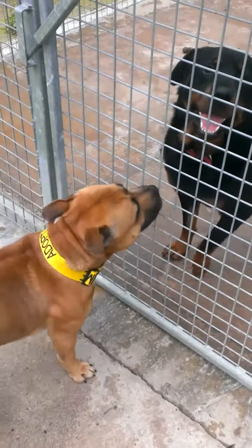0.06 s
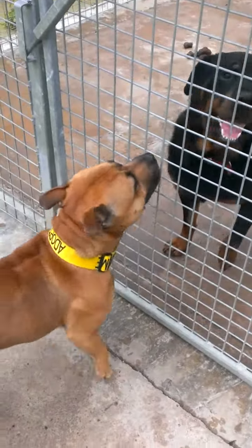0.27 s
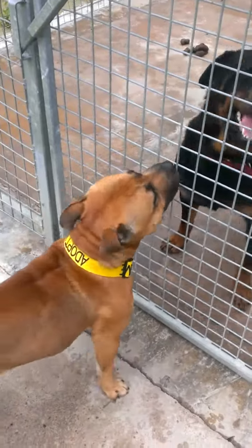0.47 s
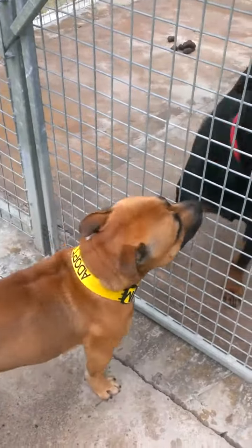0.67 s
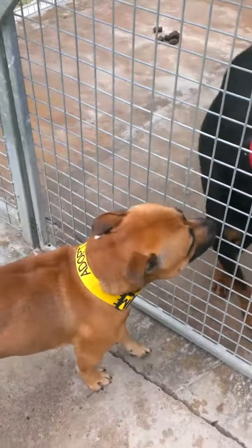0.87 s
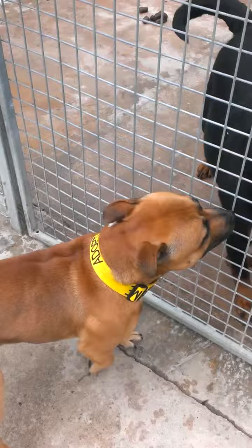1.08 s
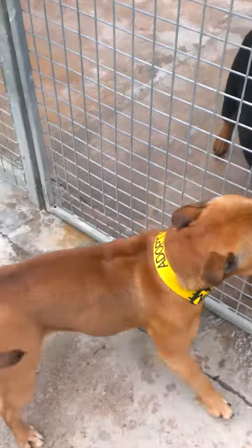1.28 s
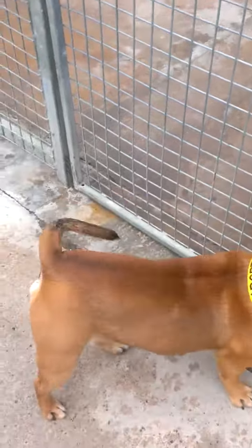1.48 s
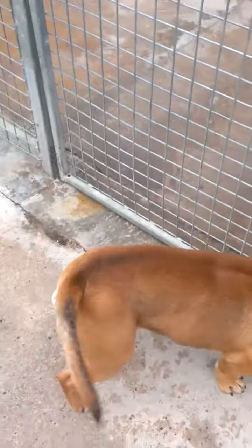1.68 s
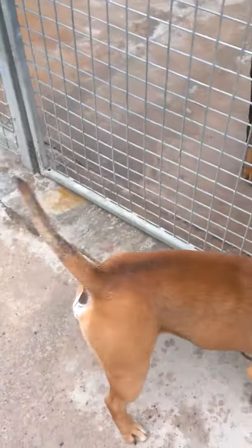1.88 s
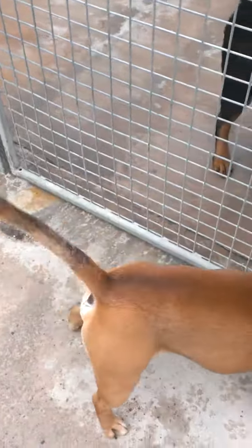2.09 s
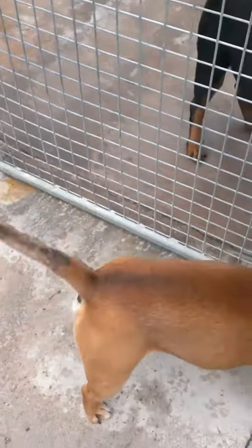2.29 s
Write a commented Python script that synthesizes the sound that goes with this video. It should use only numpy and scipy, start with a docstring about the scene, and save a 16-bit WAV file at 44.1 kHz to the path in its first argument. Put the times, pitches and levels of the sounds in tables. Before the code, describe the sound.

Three quick near barks, a brief gap with a faint distant bark, then a fourth; hoarse far barks, a gliding howl, thin whistling whines and squeaks follow, with concrete kennel echo and faint outdoor air.

```python
"""A dog barks four times at a kennel fence, close by: vocal partials in three throat registers, broken into
half-pitch tones and rasp partway through, with low grunts mostly after the barks, a groan and soft paw falls.
Dogs farther off answer with hoarse barks of tone and noise, mostly echo. Howls and whistles glide, the whistles
with sidebands; squeaks are grainy with their octave, a whimper is rich in overtones, and noise hisses around them.
Decaying noise makes the echo of the concrete pens; coloured noise makes a faint outdoor air that slowly grows."""
import sys
import numpy as np
from scipy import signal
from scipy.fft import rfft, irfft, next_fast_len
from scipy.io import wavfile
from scipy.ndimage import uniform_filter1d, map_coordinates

SR = 44100
rng = np.random.default_rng(int(sys.argv[2]) if len(sys.argv) > 2 else 0)


def int16_out(signal):
    """Quantize to a 16-bit WAV file."""
    q = np.round(np.clip(np.atleast_2d(signal).T, -1, 1) * 32767)
    wavfile.write(sys.argv[1], SR, q.astype(np.int16))


N = 101430  # samples

# All source levels below are set ahead of the trims, flutter and echo sends in the functions.
# near barks: breakpoints (t/s, pitch f/Hz, fundamental level/dB, overtone level/dB, treble level/dB)
BARK_A = [(0.215, 658.3, -43, -41.5, -64.5), (0.234, 631.3, -29.5, -16, -32.5),
          (.25, 671.3, -28.5, -19.5, -23.5), (0.266, 743.2, -12, -19, -20.5),
          (0.288, 724.3, -12.5, -21, -29.5), (0.317, 647, -15.5, -27.5, -31),
          (0.337, 517, -27, -43.5, -62.5)]
BARK_B = [(0.528, 525, -41, -37.5, -43.5), (.54, 562, -19, -17.5, -39.5),
          (0.556, 640.5, -13.5, -30.5, -30.5), (0.582, 649.2, -9.5, -24.5, -26.5),
          (0.6, 628.1, -22.5, -16.5, -26), (.622, 615.8, -13, -28, -26), (.642, 542.6, -19.5, -22.5, -47),
          (0.663, 495, -35, -32.5, -48)]
BARK_C = [(.778, 362.6, -36, -78, -53), (0.823, 484.6, -27, -44, -59), (0.856, 628.2, -18, -24, -35.5),
          (0.878, 677.6, -11, -28, -33.5), (.902, 690.3, -12.5, -39.5, -37.5),
          (0.918, 657.2, -18.5, -18.5, -26.5), (.935, 595.4, -25.5, -26.5, -34),
          (0.956, 517.5, -22, -34.5, -48.5)]
BARK_D = [(1.315, 402, -37.5, -43, -59), (1.353, 517.3, -34, -30.5, -47.5),
          (1.374, 558.8, -23.5, -14.5, -21.5), (1.388, 656.5, -17.5, -14, -20.5),
          (1.406, 701.5, -9.5, -25, -25), (1.436, 636.3, -19, -20.5, -26), (1.461, 514, -20.5, -31, -50.5)]
# how each bark breaks (break t/s, rasp before level/dB, rasp after level/dB, half-pitch tone level/dB,
# bark gain level/dB, lift of the snarl resonance level/dB)
BREAKS = [(0.24, -31, -3, -2, 0, -4), (.58, -16, -3, -7, -0.5, 0), (.904, -13, 2, -11, 1.5, 0),
          (1.381, -14, -10, -6, -1, 9)]
BREAK_S, SHIMMER_DB = 0.0033, 3.5
JITTER_CLEAN, JITTER_ROUGH = 0.00407, 0.013  # fraction of the pitch; the break adds the rough part
CHEST_DB, TREBLE_DB = -1, -1  # register trims
# added to each bark's rasp and half-pitch levels, by register
CHEST_RASP_DB, MOUTH_RASP_DB, TREBLE_RASP_DB = -24, -5, 4.5
CHEST_HALF_DB, TREBLE_HALF_DB = -25.5, 2
# resonances of the throat in three registers (f/Hz, level/dB)
CHEST = [(120, -98.5), (270, -48), (370, -14), (450, -24), (680, 4.5), (900, 11), (1250, -57)]
MOUTH = [(500, -75), (870, -10), (1100, 4), (1310, -0.5), (1560, -7.5), (1950, -5), (2300, -14.5),
         (2800, -18.5), (3250, -28), (3650, -22), (4500, -29), (6000, -61)]
TREBLE = [(2800, -47), (4000, -18.5), (5200, -8.5), (6300, -7.5), (6800, -2.5), (7150, 5), (7600, -7.5),
          (8600, -9), (10300, -27.5)]
TREBLE_FOCUS = 1.33  # the tone rings the top resonance more sharply than the rasp does
SNARL_HZ, SNARL_WIDTH_HZ = 2800, 300
DULL_BELOW_DB, DULL_PER_DB = -10, 1  # a softer voice loses overtones (dB per octave for each dB)
STRAY_HZ, STRAY_DB = 9000, 3.5  # partials stray in level and phase, more so the higher they lie

# low grunts, mostly after the barks (t/s, length/s, level/dB)
GRUNTS = [(0.423, 0.068, -36), (0.705, 0.081, -40.5), (0.984, 0.048, -34.5), (1.462, 0.062, -40.5)]
GRUNT_HZ, GRUNT_RASP_DB = 246, 0.5
# resonances of the grunting throat (f/Hz, level/dB)
GRUNT_THROAT = [(60, -56), (190, -6), (250, -10.5), (340, 5.5), (470, -3), (800, -34.5), (2000, -22),
                (3200, -22), (7000, -12.5), (10000, -28)]
# low groan of the near dog (t/s, pitch f/Hz, level/dB)
GROAN = [(.705, 275, -39), (.725, 238, -35.5), (.775, 241.2, -37), (.812, 286, -52)]
# soft paw falls on concrete (t/s, level/dB)
PAWS = [(1.68, -52), (1.788, -55), (2.087, -53.5)]
# spectrum of a paw fall (f/Hz, level/dB)
PAW_COLOUR = [(90, -21), (160, 2), (300, -19.5), (2000, -52.5)]

# far barks (t/s, length/s, top pitch f/Hz, level/dB)
FAR_BARKS = [(1.021, 0.1138, 793.2, -23), (1.095, 0.081, 710, -31.5), (1.474, 0.054, 830, -22),
             (1.525, 0.0983, 692.5, -29), (1.7, 0.0993, 767, -25), (1.79, 0.1165, 815.7, -29.5)]
FAR_ARCH = 0.051  # fraction of the pitch lost at both ends
FAR_RASP_DB, FAR_WET_DB, FAR_DRY_DB = 0, -3, -4
# throat resonances of the far dogs (f/Hz, level/dB)
FAR_THROAT = [(100, -103), (280, -42), (390, -10), (560, -12.5), (780, 4), (1000, -4), (1200, -5),
              (1500, -5.5), (1900, -11), (2600, -30), (3500, -37.5), (6500, -21), (10000, -46.5)]

# howls (t/s, pitch f/Hz, level/dB)
HOWL_LOW = [(1.76, 770, -35), (1.81, 813.5, -17.5), (1.88, 803.7, -42), (1.95, 809.4, -33),
            (1.99, 788, -45), (2.05, 765, -43)]
HOWL_UNDERTONE = [(1.729, 395, -50), (1.78, 402.7, -38), (1.884, 388, -53)]
HOWL_HIGH = [(1.93, 909, -34), (1.96, 959.3, -32.5), (2.032, 942, -22.5), (2.048, 943, -44.5),
             (2.069, 927, -24.5), (2.149, 936, -41), (2.199, 926.3, -25), (2.263, 929, -34),
             (2.286, 892, -44)]
HOWL_FALLING = [(2.058, 1240, -46), (2.084, 1265, -40.5), (2.111, 1175, -37.5), (2.153, 1049, -34.5),
                (2.175, 920, -48)]
# harmonics of a howl or groan, from the fundamental up (level/dB)
HOWL_OVERTONES = [-3, -31]
# pan of the low howl, its undertone, the high and the falling howl (left minus right level/dB)
HOWL_PANS = [3, -2, -13.5, -5]
HOWL_WAVER, HOWL_WET_DB = 0.0027, -6  # waver: fraction of the pitch

# whistling whines, one list for each (t/s, pitch f/Hz, level/dB)
WHISTLES = [
    [(-.01, 7230, -52), (.14, 7520, -68)],
    [(1.645, 4330, -54.5), (1.697, 5110, -30), (1.725, 5160, -38), (1.755, 4980, -32), (1.785, 4700, -43.5),
     (1.825, 4480, -57)],
    [(2.02, 4330, -53), (2.05, 4520, -42), (2.075, 4540, -35), (2.11, 4520, -37), (2.135, 4420, -50),
     (2.19, 4260, -50.5)],
]
# harmonics of a whistle, from the fundamental up (level/dB)
WHISTLE_OVERTONES = [0.39, -12]
WHISTLE_WAVER, WHISTLE_FLUTTER_DB = .011, 2.5  # waver: fraction of the pitch
WHISTLE_BEAT_HZ, WHISTLE_BEAT_DB = 1280, -16.5
WHISTLE_SMEAR_S, WHISTLE_WET_DB = 0.0099, -12.5
# short grainy squeaks and, at 2.01 s, a brief third harmonic of the high howl
# (t/s, length/s, first f/Hz, last f/Hz, level/dB)
SQUEAKS = [(.7, 0.035, 4100, 4060, -45.5), (0.764, 0.024, 3840, 3610, -43.5),
           (1.104, 0.051, 5580, 5150, -39), (1.186, 0.044, 5030, 4880, -43.5),
           (1.241, 0.015, 6430, 7020, -37), (1.848, 0.015, 3540, 3570, -43), (2.01, 0.05, 2810, 2883, -47),
           (2.147, 0.03, 4460, 3550, -48), (2.276, 0.024, 3100, 2700, -49)]
SQUEAK_WAVER, SQUEAK_WAVER_HZ = .04, 1500  # fraction of the pitch, rate
SQUEAK_OCTAVE_DB, SQUEAK_TOP_HZ = -7, 8500
# thin nasal whimper as the last bark begins (t/s, pitch f/Hz, level/dB)
WHIMPER = [(1.29, 1284, -49.5), (1.345, 1246, -50.5)]
# harmonics of the whimper, from the fundamental up (level/dB)
WHIMPER_OVERTONES = [-10, -2, -1.5, -4.5, 1]
# brief airy hisses, mostly around the whines (t/s, length/s, level/dB)
HISSES = [(0.125, 0.057, -54.5), (1.26, 0.22, -49.5), (1.619, 0.22, -48), (2.006, 0.3, -45)]
# spectrum of a hiss (f/Hz, level/dB)
HISS_COLOUR = [(1500, -29.5), (3500, -5), (5200, 0), (7200, 11), (9000, 2), (10500, -17.5)]

# reflections from the nearest walls (delay t/s, level/dB)
WALLS = [(.0062, -26.5), (.017, -11), (.031, -22), (.056, -18), (.088, -23.5)]
# decay of the pens' echo to -60 dB (f/Hz, t60 t/s)
PENS_DECAY = [(150, 0.98), (700, 0.6), (1800, 0.76), (3500, 0.58), (7000, 0.45), (10000, 0.26)]
# spectrum of the pens' echo (f/Hz, level/dB)
PENS_COLOUR = [(150, -7), (700, 5), (1800, -0.5), (3500, 6), (7000, -3), (10000, 8.5)]
NEAR_WET_DB, TAIL_RISE_S, TAIL_SIDE_DB = -9, 0.0087, -9
# spectrum of the outdoor air (f/Hz, level/dB)
AIR = [(80, -14.5), (200, 1), (400, -4), (700, -2), (1200, -14.5), (4500, -18), (7200, -4), (10500, -17)]
AIR_DB, AIR_GROWS_DB = -58, 5  # at the start, rise to the end
# stereo balance (f/Hz, left minus right level/dB)
BALANCE_LR = [(150, 2.5), (330, -4.5), (620, 1), (1050, 3), (1850, 0), (3200, 0)]
# stereo phase (f/Hz, left lead/rad)
PHASE_LR = [(300, 0.21), (600, 0.28), (860, 0.95), (1120, 0.57), (1380, 2), (1900, -0.46), (3300, 0.3),
            (8000, 0.47)]
TOP_HZ = 10600


def amp(db):
    """Decibels to gain."""
    return 10 ** (np.asarray(db) / 20)


def unit(x):
    """Scale to rms 1."""
    return x / np.sqrt(np.mean(x ** 2) + 1e-20)


def along(points, hz):
    """(Hz, value) points read on a log frequency axis."""
    f, v = np.transpose(points)
    return np.interp(np.log(hz + 1), np.log(f + 1), v)


def clock():
    """Time of every sample in seconds."""
    return np.arange(N) / SR


def curves(rows, fade_s=0.0044, size=200):
    """A gate over the rows' span, then each column per sample, rounded over size samples."""
    s, *columns = np.transpose(rows)
    t = clock()
    gate = np.clip(np.minimum(t - s[0], s[-1] - t) / fade_s + .5, 0, 1)
    return [gate] + [uniform_filter1d(np.interp(t, s, column), size=size) for column in columns]


def swell(start, length, attack_s, release_s):
    """Attack, hold and release; the release is centred on the end of the length."""
    t = clock() - start
    return np.clip(np.minimum(t / attack_s, (length - t) / release_s + .5), 0, 1)


def wobble(rate):
    """A smooth random curve, rate knots a second."""
    knots = rng.standard_normal(int(N * rate / SR) + 4)
    return map_coordinates(knots, [clock() * rate], order=2)


def filtered(x, response):
    """x times a response of frequency."""
    m = next_fast_len(N + 8192)
    return irfft(rfft(x, m) * response(np.fft.rfftfreq(m, 1 / SR)), m)[..., :N]


def noise(colour):
    """Coloured noise of rms 1."""
    return unit(filtered(rng.standard_normal(N), lambda hz: amp(along(colour, hz))))


def cycles(pitch):
    """Running phase of a pitch curve."""
    return 2 * np.pi * np.cumsum(pitch) / SR


def voiced(pitch, gate, throat, multiples, dull=0):
    """Partials weighted by the throat, levelled near rms 1 while the gate is open; high ones stray more."""
    on, out = gate > 0, np.zeros(N)
    k = np.asarray(multiples)[:, None]
    hz, t = k * pitch[on], clock()[on]

    def stray(rate):
        """An independent random curve for each partial, wider with frequency."""
        knots = rng.standard_normal((len(k), 1024))
        paths = np.array([map_coordinates(row, [t * rate], order=2) for row in knots])
        return paths * np.sqrt(hz / STRAY_HZ)

    tilt_db = (dull * gate)[on] * np.log2(k)
    weight = amp(along(throat, hz) + STRAY_DB * stray(70) - tilt_db)
    start_phase = rng.uniform(0, 2 * np.pi, k.shape)
    waves = np.sin(k * cycles(pitch)[on] + start_phase + hz / STRAY_HZ * stray(260))
    out[on] = (weight * waves).sum(0) / np.sqrt((weight ** 2).sum(0) / 2)
    return out


def rasp(pitch, throat, depth=0.22):
    """Turbulence in the throat, puffed by every other cycle of the folds."""
    return unit(noise(throat) * (1 + depth * np.sin(cycles(pitch) / 2)))


def bark(rows, break_s, clean_db, rough_db, half_db, gain_db, snarl_db):
    """An arched call whose folds break into period doubling and a changed level of rasp."""
    gate, pitch, chest_db, mouth_db, treble_db = curves(rows)
    broken = np.clip((clock() - break_s) / BREAK_S + .5, 0, 1)
    pitch = pitch * (1 + (JITTER_CLEAN + JITTER_ROUGH * broken) * wobble(350))
    rasp_db = clean_db + (rough_db - clean_db) * broken
    dull = DULL_PER_DB * np.maximum(DULL_BELOW_DB - chest_db, 0)
    mouth = [(hz, db + snarl_db * np.exp(-((hz - SNARL_HZ) / SNARL_WIDTH_HZ) ** 2)) for hz, db in MOUTH]
    # throat, focus, harmonics, level, added rasp, added half-pitch tone
    registers = [
        (CHEST, 1, np.arange(1, 2), chest_db + CHEST_DB, CHEST_RASP_DB, CHEST_HALF_DB),
        (mouth, 1, np.arange(2, 9), mouth_db, MOUTH_RASP_DB, 0),
        (TREBLE, TREBLE_FOCUS, np.arange(8, 20), treble_db + TREBLE_DB, TREBLE_RASP_DB, TREBLE_HALF_DB)]
    out = np.zeros(N)
    for throat, focus, k, level_db, more_rasp_db, more_half_db in registers:
        air = amp(rasp_db + more_rasp_db)
        half = broken * amp(half_db + more_half_db)
        rung = [(hz, focus * db) for hz, db in throat]
        wave = voiced(pitch, gate, rung, k, dull)
        wave = wave + half * voiced(pitch, gate, rung, k - .5)  # period doubling
        wave = wave + air * rasp(pitch, throat)
        out += amp(level_db) * wave / np.sqrt(1 + air ** 2 + half ** 2)
    shimmer_db = SHIMMER_DB * broken * np.tanh(wobble(220))
    return out * gate * amp(gain_db + shimmer_db)


def grunts():
    """A low, loose rattle of the throat: four unsteady harmonics mixed with rasp."""
    level = sum(amp(db) * swell(s, length, attack_s=0.011, release_s=0.069) for s, length, db in GRUNTS)
    pitch = GRUNT_HZ * (1 + 0.068 * wobble(120))
    tone = voiced(pitch, np.ones(N), GRUNT_THROAT, np.arange(1, 5))
    return level * unit(tone + amp(GRUNT_RASP_DB) * rasp(pitch, GRUNT_THROAT))


def near_dog():
    """Barks, grunts and a groan, thrown back by the nearest walls and the pens."""
    x = grunts() + whine(GROAN, HOWL_OVERTONES, JITTER_ROUGH)
    for rows, how in zip([BARK_A, BARK_B, BARK_C, BARK_D], BREAKS):
        x = x + bark(rows, *how)
    # each wall is a delayed copy, made by a phase slope
    walls = filtered(x, lambda hz: sum(amp(db) * np.exp(-2j * np.pi * hz * s) for s, db in WALLS))
    return x + walls + amp(NEAR_WET_DB) * pens(x)


def paws():
    """Padded steps of the near dog: soft swells of low noise."""
    level = sum(amp(db) * swell(s, 0.046, attack_s=0.03, release_s=0.059) for s, db in PAWS)
    return noise(PAW_COLOUR) * level


def far_dogs():
    """Hoarse arched barks, a fundamental mixed with rasp, much of them echo."""
    x = np.zeros(N)
    air = amp(FAR_RASP_DB)
    for s, length, top_hz, db in FAR_BARKS:
        gate = swell(s, length, attack_s=0.011, release_s=0.081)
        arch = np.clip(2 * (clock() - s) / length - 1, -1, 1) ** 2
        pitch = top_hz * (1 - FAR_ARCH * arch + 0.03017 * wobble(200))
        tone = voiced(pitch, gate, FAR_THROAT, np.arange(1, 2))
        x += amp(db) * gate * (tone + air * rasp(pitch, FAR_THROAT)) / np.hypot(1, air)
    return amp(FAR_DRY_DB) * x + amp(FAR_WET_DB) * pens(x)


def whine(rows, overtones, waver, size=200):
    """A slightly unsteady tone: a few harmonics on one gliding phase."""
    gate, pitch, db = curves(rows, size=size)
    phase = cycles(pitch * (1 + waver * wobble(400)))
    harmonics = sum(amp(level) * np.sin(k * phase) for k, level in enumerate(overtones, 1))
    return gate * amp(db) * np.sqrt(2) * harmonics


def whistle(rows):
    """A nasal whistle; a second, lower oscillation adds two sidebands above it."""
    gate, pitch, db = curves(rows)
    beat = WHISTLE_BEAT_HZ * (1 + 0.043 * wobble(900))
    sidebands = sum(np.sin(cycles(pitch + k * beat)) for k in (1, 2))
    tone = whine(rows, WHISTLE_OVERTONES, WHISTLE_WAVER, size=800)
    return tone + gate * amp(db + WHISTLE_BEAT_DB) * sidebands


def squeaks():
    """Brief glides with their octave, one of them a howl's third harmonic, made grainy by fast pitch waver."""
    x = np.zeros(N)
    for s, length, first_hz, last_hz, db in SQUEAKS:
        glide = np.interp(clock(), [s, s + length], [first_hz, last_hz])
        phase = cycles(glide * (1 + SQUEAK_WAVER * wobble(SQUEAK_WAVER_HZ)))
        tone = np.sin(phase) + amp(SQUEAK_OCTAVE_DB) * np.sin(2 * phase)
        x += amp(db) * swell(s, length, attack_s=0.0032, release_s=0.027) * tone
    return filtered(x, lambda hz: 1 / (1 + (hz / SQUEAK_TOP_HZ) ** 10))


def hisses():
    """Brief airy swells of bright, fluttering noise."""
    air = noise(HISS_COLOUR)
    level = sum(amp(db) * swell(s, length, attack_s=0.013, release_s=0.029) for s, length, db in HISSES)
    return air * level * amp(-2.5 + 4.3 * wobble(50))


def whining_dogs():
    """Howls panned across several pens, and high whistles, squeaks and a whimper with hiss."""
    ports = np.array([[.5], [-.5]])
    howl_rows = [HOWL_LOW, HOWL_UNDERTONE, HOWL_HIGH, HOWL_FALLING]
    howls = [whine(rows, HOWL_OVERTONES, HOWL_WAVER) for rows in howl_rows]
    placed = sum(howl * amp(pan_db * ports) for howl, pan_db in zip(howls, HOWL_PANS))
    whines = sum(whistle(rows) for rows in WHISTLES) + squeaks()
    whines = whines + whine(WHIMPER, WHIMPER_OVERTONES, WHISTLE_WAVER)
    high = whines * amp(-2.0 + WHISTLE_FLUTTER_DB * wobble(160)) + hisses()
    echo = amp(HOWL_WET_DB) * pens(sum(howls)) + amp(WHISTLE_WET_DB) * pens(high)
    return placed + high + amp(-8.0) * scattered(high) + echo


def scattered(x):
    """A short stereo smear from the ground and the fence: fast-decaying noise as impulse response."""
    t = np.arange(SR // 10) / SR
    spread = rng.standard_normal((2, len(t))) * np.exp(-t / WHISTLE_SMEAR_S)
    return signal.fftconvolve(x[None], spread / np.linalg.norm(spread[0]), axes=1)[:, :N]


def pens(x):
    """The diffuse stereo echo of the concrete pens: noise decaying at its own rate in each band."""
    hz, t, z = signal.stft(rng.standard_normal((2, SR)), SR, nperseg=256)
    decay_db = 60 * t / along(PENS_DECAY, hz)[:, None]
    rise = 1 - np.exp(-t / TAIL_RISE_S)
    shape = amp(along(PENS_COLOUR, hz)[:, None] - decay_db) * rise
    tail = signal.istft(z * shape, SR, nperseg=256)[1]
    mid, side = signal.fftconvolve(x[None], tail / np.linalg.norm(tail[0]), axes=1)[:, :N]
    return np.array([mid + amp(TAIL_SIDE_DB) * side, mid - amp(TAIL_SIDE_DB) * side])


def background():
    """Faint outdoor air: wide coloured noise, slowly growing and gently wavering."""
    mid, side = noise(AIR), amp(-10.0) * noise(AIR)
    level_db = AIR_DB + AIR_GROWS_DB * np.linspace(0, 1, N) + 2.1 * wobble(5.1)
    return np.array([mid + side, mid - side]) * amp(level_db)


def scene():
    """All the dogs and the yard."""
    return near_dog() + paws() + far_dogs() + whining_dogs() + background()


def record(dry):
    """Two microphone ports differ in gain and phase; nothing passes above the band limit."""
    ports = np.array([[.5], [-.5]])

    def response(hz):
        """Half of each difference goes to either side."""
        gain = amp(ports * along(BALANCE_LR, hz))
        turn = np.exp(1j * ports * along(PHASE_LR, hz))
        return gain * turn * (hz < TOP_HZ)

    return filtered(dry, response)


dry = scene()
out = record(dry)
int16_out(out)
```